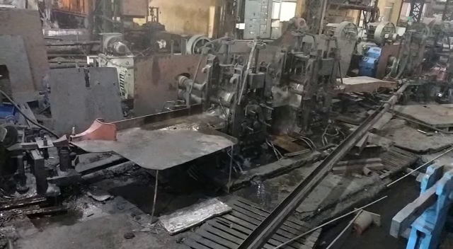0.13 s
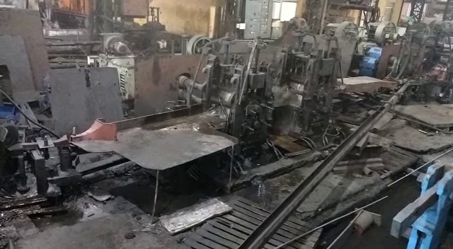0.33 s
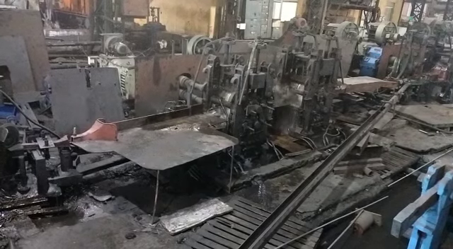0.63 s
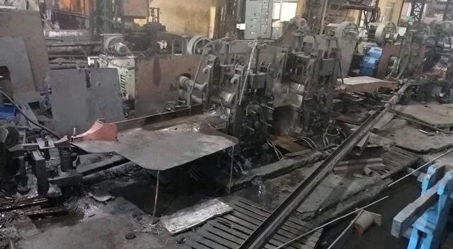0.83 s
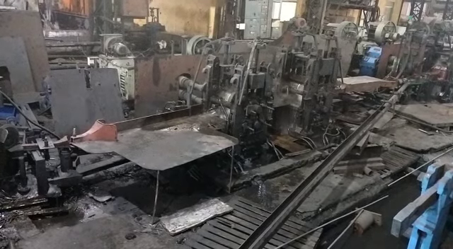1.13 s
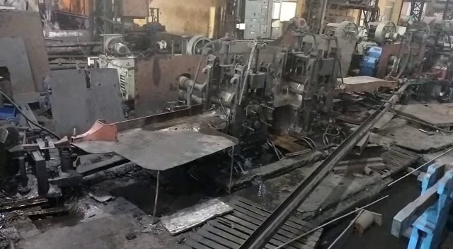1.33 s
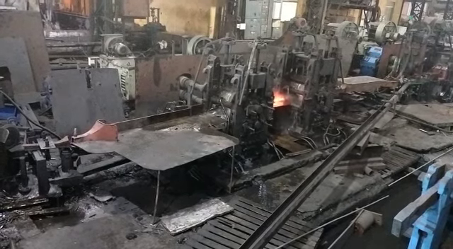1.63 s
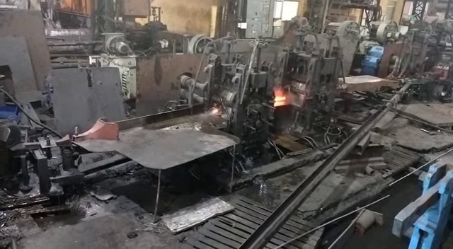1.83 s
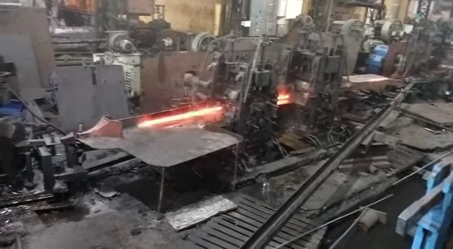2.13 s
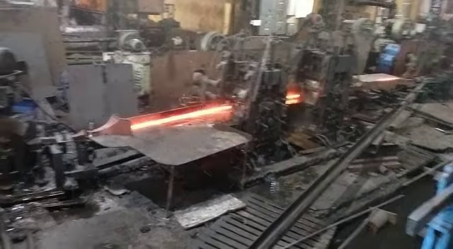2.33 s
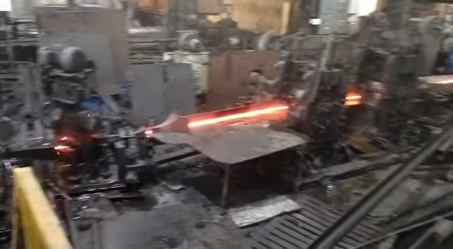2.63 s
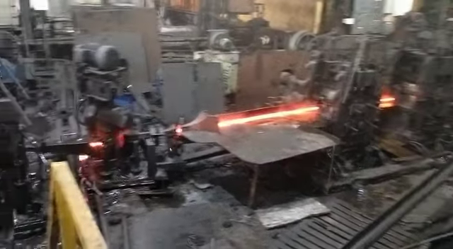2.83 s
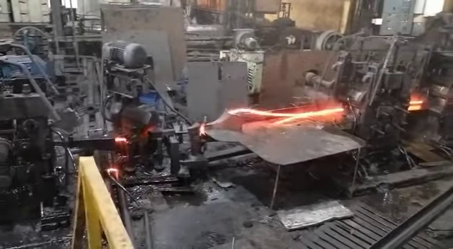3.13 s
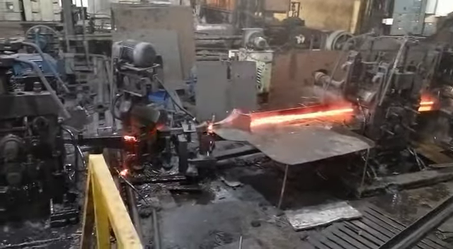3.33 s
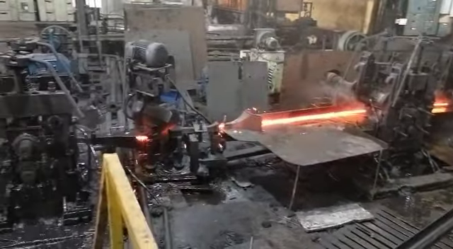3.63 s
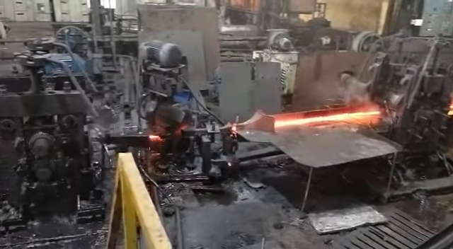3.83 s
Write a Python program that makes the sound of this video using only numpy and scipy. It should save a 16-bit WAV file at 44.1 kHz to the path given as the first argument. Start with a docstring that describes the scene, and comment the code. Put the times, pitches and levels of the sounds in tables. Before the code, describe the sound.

Rolling mill roars and hums, air valve hisses, then a metal bar clatters through rolls

```python
"""A steel rolling mill hall: drives and rolls roar, as patchy shaped noise, under unsteady sine tones.
A valve lets off air in two bursts of noise with a sagging whistle. A hot bar clanks through steel guides
and over a plate: clattering noise with ringing modes, rod pings, a grind in the rolls and a hall tail.
Two spaced microphones hear it; a gain control ducks after loud treble. The sound starts abruptly."""
import sys
import numpy as np
from scipy import signal
from scipy.fft import rfft, irfft, next_fast_len
from scipy.io import wavfile
from scipy.ndimage import uniform_filter1d, minimum_filter1d, map_coordinates

SR = 44100
rng = np.random.default_rng(int(sys.argv[2]) if len(sys.argv) > 2 else 0)


def to_linear_factor(level_db):
    """Convert decibel levels (scalar or array-like) to linear amplitude factors."""
    exponent = np.asarray(level_db, float) / 20
    return 10 ** exponent


def waveform_to_disk(signal):
    """Save audio, clipped to [-1, 1], as 16-bit WAV at the path in sys.argv[1]."""
    frames = np.transpose(np.atleast_2d(signal))
    scaled = np.clip(frames, -1, 1) * 32767
    samples = np.round(scaled).astype(np.int16)
    wavfile.write(sys.argv[1], SR, samples)


N = 176400
T = np.arange(N) / SR

# Slow swell of the machines. Each row: time in seconds, then roar, rasp, hum octave and hum gain in dB.
MACHINE_SWELL = [(.27, -2, 1, 1, 0.5), (.5, 0, 4, 6, -6), (.75, -1, 4, 2.5, 2.5), (1, -2.5, 5, -3, -2),
                 (1.35, 0.5, 6, -4, 2.5), (1.5, -0.5, 3.5, -5, -0.5), (1.75, -.5, 4, 6.5, 2),
                 (1.9, -1, 3.5, -4, 0), (2.15, -1.5, 3, -4, -5), (2.3, -2.5, 1, 0, -2.5),
                 (2.7, 0.5, 6, -0.5, 2.5), (2.95, 0, 4.5, 5, -2.5), (3.15, -3, 3.5, -5.5, 3.5),
                 (3.5, 0.5, 4.5, 3.5, 1), (3.75, -1.5, 4, -0.5, 2.5), (4, 1, 4.5, 0.5, -10.5)]


def unit(x):
    """Scales to rms 1."""
    return x / np.sqrt(np.mean(x ** 2) + 1e-20)


def along(points, hz):
    """Interpolates (Hz, value) points on a log frequency axis."""
    f, v = np.transpose(points)
    return np.interp(np.log(hz + 1), np.log(f + 1), v)


def wobble(rate):
    """A smooth random curve, rate knots a second (45 at most)."""
    return map_coordinates(rng.standard_normal(200), [T * min(rate, 45)])


def filtered(x, response):
    """Multiplies the spectrum of x by a response of frequency."""
    m = next_fast_len(x.shape[-1] + 8192)
    spectrum = rfft(x, m) * response(np.fft.rfftfreq(m, 1 / SR))
    return irfft(spectrum, m)[..., :x.shape[-1]]


def diffuse(spectrum, patchy_db):
    """Noise from all sides, patchy in time and pitch; two spaced microphones agree less at high pitch."""
    spacing_m, sound_m_per_s = 0.1637, 343
    z = signal.stft(rng.standard_normal((2, N)), nperseg=512)[2]
    field = uniform_filter1d(rng.standard_normal(z.shape[1:]), 5, 0)
    field = uniform_filter1d(field, 9, 1)
    pair = signal.istft(z * to_linear_factor(patchy_db * unit(field)), nperseg=512)[1][:, :N]

    def mid_side(hz):
        coherence = np.sinc(2 * hz * spacing_m / sound_m_per_s)
        turn = np.arccos(np.clip(coherence, -1, 1)) / 2
        return to_linear_factor(along(spectrum, hz)) * [np.cos(turn), np.sin(turn)]

    mid, side = filtered(pair, mid_side)
    return unit(np.array([mid + side, mid - side]))


def panned(x, left_db):
    """Two channels, left over right by left_db."""
    return x * to_linear_factor(np.array([[left_db / 2], [-left_db / 2]]))


def tone(hz, wander_hz):
    """A sine of rms 1 with wandering frequency."""
    phase = 2 * np.pi * np.cumsum(hz + wander_hz * wobble(22.005)) / SR
    return np.sqrt(2) * np.sin(phase + rng.uniform(0, 2 * np.pi))


def ring(modes, t, rough, attack_s):
    """Decaying struck modes with drifting phase, new strengths each blow."""
    walk = np.cumsum(rng.standard_normal((len(modes), len(t))), axis=1)
    drift = rough * uniform_filter1d(uniform_filter1d(walk, size=40), size=40)
    total = 0
    for (hz, db, t60), d in zip(modes, drift):
        decay = to_linear_factor(db + rng.normal(0, 1.3) - 60 * t / t60)
        total = total + decay * np.sin(2 * np.pi * hz * t + d)
    return total * (1 - np.exp(-(t / attack_s) ** 2))


def ring_pair(modes, t, rough, attack_s):
    """The same modes rung independently in each channel."""
    return np.array([ring(modes, t, rough, attack_s) for _ in range(2)])


def roar():
    """Rolls, drives and fans: three diffuse noises, low roar, rasp and high fizz, swelling slowly."""
    # Noise colours. Each row: frequency in Hz, relative level in dB.
    roar_colour = [(15, -52.5), (25, -63.5), (76, -28), (107, -12.5), (140, -9), (269, -5), (300, -2.5),
                   (425, -7), (557, -10.5), (593, -7), (642, -9), (985, -10), (1100, -20), (1430, -51.5),
                   (2420, -120)]
    rasp_colour = [(530, -3.5), (900, -2.5), (1130, -0.5), (1210, -3), (1290, -2.5), (2190, -10),
                   (2500, -3), (2850, -5), (3260, -3), (4100, -3), (4390, -8.5), (5840, -10), (6480, -22),
                   (7130, -23), (8800, -47.5), (11400, -83), (19400, -120)]
    fizz_colour = [(5060, -31), (8600, 5.5), (9240, -24), (9580, -21), (10100, 1.5), (11300, -10),
                   (11600, 4.5), (12000, 1), (13000, -0.5), (14800, -5), (15900, -4.5)]
    # Microphone mismatch. Each row: frequency in Hz, left over right in dB.
    mic_tilt = [(60, 0.83), (250, 1), (600, 0), (1100, 1.65), (2000, 6), (3000, 1.5), (3600, 0), (5000, -1),
                (6000, -5.5), (7100, -9.5), (8200, 3), (8800, 2), (10000, 1), (15000, -2.16)]
    roar_db, rasp_db, fizz_db = -15, -20, -62.5
    s, roar_swell_db, rasp_swell_db, _, _ = np.transpose(MACHINE_SWELL)
    low_gain = to_linear_factor(roar_db + np.interp(T, s, roar_swell_db) + 0.55 * wobble(7.35))
    high_gain = to_linear_factor(np.interp(T, s, rasp_swell_db) + 0.072 * wobble(11))
    low = low_gain * diffuse(roar_colour, patchy_db=0.83)
    rasp = to_linear_factor(rasp_db) * diffuse(rasp_colour, patchy_db=1.5)
    fizz = to_linear_factor(fizz_db) * diffuse(fizz_colour, patchy_db=2.5)
    rush = low + high_gain * (rasp + fizz)
    return filtered(rush, lambda hz: to_linear_factor(along(mic_tilt, hz) * np.array([[.5], [-.5]])))


def whine(hz, db, wander_hz, left_db):
    """A panned tone with fluttering level."""
    flutter_db, flutter_rate = 3, 22
    return panned(to_linear_factor(db + flutter_db * wobble(flutter_rate)) * tone(hz, wander_hz), left_db)


def drive_tones():
    """Gear and motor tones; the main motor hum and its octave swell on their own."""
    # Each row: frequency in Hz, level in dB, wander in Hz, left over right in dB.
    steady_tones = [(151.06, -33.5, 3.092, -2.5), (266.56, -28, 4.81, 0.5), (328.55, -32.5, 2.93, 4),
                    (448, -41, 2.39, 3), (1198.7, -38, 1.56, 0.5), (1303, -48.5, 1.87, 6.5),
                    (1617.2, -42.5, 2.2, 2.5), (3538, -46.5, 14, 1.5)]
    s, _, _, octave_swell_db, hum_swell_db = np.transpose(MACHINE_SWELL)
    hum = whine(298, db=-23.5, wander_hz=1.93, left_db=-1)
    octave = whine(600, db=-28.5, wander_hz=2.5, left_db=1)
    motor = to_linear_factor(np.interp(T, s, hum_swell_db)) * hum + to_linear_factor(np.interp(T, s, octave_swell_db)) * octave
    return motor + sum(whine(*row) for row in steady_tones)


def valve():
    """Air bursts out, holds, sputters and fades as pressure falls, the treble first; its whistle sags."""
    # Each row: start in seconds, level in dB, hold in seconds, t60 in seconds.
    puffs = [(0.982, -23, 0.013, 0.34), (1.152, -16, 0.08, 1.16)]
    # Each row: frequency in Hz, relative level in dB.
    air_colour = [(2500, -28), (3500, -10), (3950, -1), (4200, -2), (4500, -2.5), (4800, -9.5), (5200, -7),
                  (5650, -0.5), (6000, -13), (6500, -14.5), (7500, -16), (8800, -29), (9500, -44.5),
                  (10300, -31.5), (12000, -28.5), (13300, -36), (15300, -36), (15900, -41)]
    start_hz, end_hz, sag_s, width_hz, whistle_db = 5750, 5050, .1, 260, -7
    sputter_db = .8

    def shape(hold_share, fade_share, rise_s):
        total = 0
        for s, db, hold_s, t60 in puffs:
            fading_s = np.maximum(T - s - hold_share * hold_s, 0)
            total = total + to_linear_factor(db - 60 * fading_s / (fade_share * t60)) * np.clip((T - s) / rise_s, 0, 1)
        return total

    air = diffuse(air_colour, patchy_db=2.5)
    treble = filtered(air, lambda hz: 1 / (1 + (8000 / (hz + 1)) ** 8))
    since_s = np.min([np.where(T >= s, T - s, 10) for s, *_ in puffs], axis=0)
    pitch_hz = end_hz + (start_hz - end_hz) * np.exp(-(since_s / sag_s) ** 2)
    # narrow noise on a moving carrier
    blur = filtered(rng.standard_normal((2, 2, N)), lambda hz: 1 / (1 + (hz / width_hz) ** 2))
    phase = 2 * np.pi * np.cumsum(pitch_hz) / SR
    whistle = unit(blur[0] * np.cos(phase) + blur[1] * np.sin(phase))
    body = air - treble + to_linear_factor(whistle_db) * whistle
    jet = shape(1, 1, rise_s=.015) * body
    jet = jet + shape(hold_share=.15, fade_share=0.54, rise_s=.005) * treble
    return panned(to_linear_factor(sputter_db * wobble(30)) * jet, -1.7)


def roll_grind():
    """The bar runs through the rolls: patchy noise of uneven level, on from 2.5 s."""
    # Each row: frequency in Hz, relative level in dB.
    run_colour = [(900, -40.5), (1400, 1.5), (1800, -3.5), (2200, -0.5), (2650, -2.5), (3000, -10.5),
                  (3600, -4), (4500, -49)]
    start_s, rise_s, level_db, uneven_db = 2.5, 0.01, -31.5, 4
    noise = to_linear_factor(level_db + uneven_db * wobble(9)) * diffuse(run_colour, patchy_db=4)
    return noise * np.clip((T - start_s) / rise_s, 0, 1)


def rod_pings():
    """A short rod pings: struck modes, damped by a different share each time."""
    # Each row: start in seconds, level in dB, factor on the free ring time.
    pings = [(2.4, -20, .3), (2.413, -14, .35), (2.434, -20, 0.26), (2.612, -11, 1.1), (2.668, -20, .4),
             (2.697, -19, .6), (2.716, -16, .5), (2.841, -14, .35), (3.353, -16, .35), (3.41, -17, .35)]
    # Each row: frequency in Hz, relative level in dB, free t60 in seconds.
    rod_modes = [(4900, -8, .1), (5095, 1.5, .26), (5227, -4, .12), (5464, -6, .14), (5582, -1, .1),
                 (5835, -7, .1)]
    out, t = np.zeros((2, N + SR)), T[:SR // 2]
    for s, db, free in pings:
        modes = [(hz, level_db, t60 * free) for hz, level_db, t60 in rod_modes]
        out[:, round(s * SR):][:, :len(t)] += to_linear_factor(db) * ring_pair(modes, t, .05, .0015)
    return out[:, :N]


def clanks():
    """The bar slams the guides: grainy decaying clatter, with guide and plate modes ringing."""
    # Each row: start in seconds, level in dB, clatter t60 in seconds, brightness in dB per octave,
    # plate ring in dB, guide ring in dB.
    blows = [(.966, -26, 0.1, -11.5, -24.5, -3.5), (1.535, -21.5, .1, 4.5, -31, 0),
             (1.932, -14, 0.13, 1, -8, -1.5), (2.03, -16.5, 0.093, -2.5, -21, -4),
             (2.107, -15, 0.17, 2.5, -24.5, 1), (2.124, -13, 0.23, -2, -16, -8),
             (2.139, -15, .09, 5, -14, -6.5), (2.15, -11.5, 0.088, 6.5, -7.5, -12.5),
             (2.495, -17.5, 0.092, -2.5, -10.5, -6), (2.555, -21.5, 0.063, 1.5, -24, -5),
             (2.6, -16, 0.12, -0.5, -15.5, -3), (2.652, -14, 0.14, -1, -10, -2.5),
             (2.67, -12.5, 0.12, 0.5, -18, -4), (2.731, -8.5, 0.13, 0, -20.5, -7),
             (2.742, -15, 0.089, -3.5, -21.5, -5), (2.843, -16, 0.13, -1, -15, -6),
             (3.047, -19.5, .13, -4, -25.5, -3), (3.07, -16, 0.14, 0.5, -25, -1.5),
             (3.08, -16.5, 0.11, -2.5, -27, -2), (3.088, -9, 0.11, 3, -17.5, -8),
             (3.099, -10.5, 0.103, 1, -21.5, -8), (3.172, -21, 0.12, 1, -27, 1.5),
             (3.334, -11.5, 0.11, 2.5, -30, 0.5), (3.347, -14.5, .1, 3, -31, -6.5),
             (3.41, -19, 0.15, 0.5, -27.5, -6), (3.797, -24.5, 0.08, 6.9, -15.5, -3)]
    # Clatter colour. Each row: frequency in Hz, relative level in dB.
    crash_colour = [(200, -27), (500, -4), (1000, 1), (2000, 6.5), (3500, 7), (5500, 1), (7000, -12.5),
                    (8500, -26), (9300, -48), (10500, -38.5), (12500, -40), (15800, -40.5)]
    # Steel plate and roll guide modes. Each row: frequency in Hz, relative level in dB, t60 in seconds.
    plate_modes = [(2610, -3, 1), (2700, -7, .6), (3710, -3, .9), (3870, 0, 1.2)]
    guide_modes = [(810, 0, .14), (1100, -7, 0.082), (1960, -5, 0.092), (2560, -5, .08), (2790, -2, 0.1),
                   (3390, -2, 0.08), (3545, -2, 0.07), (3780, -6, 0.08), (4060, -6, 0.08), (4720, 0, 0.07)]
    rattle_db, attack_s = 4, 0.00306
    out, t = np.zeros((2, N + SR)), T[:SR // 2]
    for s, db, t60, slope, plate_db, guide_db in blows:
        tilt = lambda hz: slope * np.log2((hz + 1) / 3000)
        noise = filtered(rng.standard_normal((2, len(t))), lambda hz: to_linear_factor(along(crash_colour, hz) + tilt(hz)))
        grain_db = rattle_db * wobble(45)[::4][:len(t)]  # 180 knots a second
        clatter = unit(noise) * to_linear_factor(grain_db - 60 * t / t60) * (1 - np.exp(-(t / attack_s) ** 2))
        tilted = [(hz, level_db + tilt(hz), life_s) for hz, level_db, life_s in guide_modes]
        plate = to_linear_factor(plate_db) * ring_pair(plate_modes, t, 0.1696, 0.0025)
        guide = to_linear_factor(guide_db) * ring_pair(tilted, t, 0.0513, .003)
        out[:, round(s * SR):][:, :len(t)] += to_linear_factor(db) * (clatter + plate + guide)
    return out[:, :N]


def bar():
    """The bar's clanks, pings and grind, panned together."""
    return panned(clanks() + rod_pings() + roll_grind(), -0.92)


def hall(x):
    """The long, dull tail of the shed: convolution with decaying low-passed noise."""
    t60, build_s, dull_hz = 1, 0.014, 4500
    t = T[:SR]
    tail = filtered(rng.standard_normal((2, SR)), lambda hz: 1 / (1 + (hz / dull_hz) ** 4))
    tail = tail * to_linear_factor(-60 * t / t60) * (1 - np.exp(-t / build_s))
    return signal.fftconvolve(x, tail / np.linalg.norm(tail[0]), axes=1)[:, :N]


def scene():
    """Machines, valve and bar; the hall answers the bar."""
    hall_db = -8.5
    near = bar()
    return roar() + drive_tones() + valve() + near + to_linear_factor(hall_db) * hall(near)


def gain_control(dry):
    """Gain that drops soon after treble-heavy peaks and creeps back."""
    ear_hz, window_s, limit_db, depth, recover_db_per_s = 1585, 0.00938, -5.5, 0.707, 22.5
    delay = 300  # samples
    heard = filtered(dry, lambda hz: np.sqrt(1 + (hz / ear_hz) ** 2))
    power = uniform_filter1d((heard ** 2).mean(0), int(window_s * SR) + 1)
    level_db = 10 * np.log10(np.abs(power) + 1e-9)
    held_db = np.maximum.accumulate(level_db + recover_db_per_s * T) - recover_db_per_s * T
    duck_db = uniform_filter1d(-depth * np.maximum(held_db - limit_db, 0), 441)
    return to_linear_factor(np.pad(duck_db, (delay, 0), mode="edge")[:N])


def limited(x):
    """A look-ahead limiter: smoothed gain holds the peaks near the ceiling."""
    ceiling = .97
    need = minimum_filter1d(np.minimum(1, ceiling / (np.abs(x).max(0) + 1e-9)), size=401)
    return x * uniform_filter1d(uniform_filter1d(need, size=200), size=200)


def top_cut(x):
    """Nothing passes above the cut-off."""
    return signal.sosfilt(signal.butter(12, 16890, fs=SR, output="sos"), x)


def record(dry):
    """Band limits, gain control, an abrupt start, then the limiter."""
    low_cut_hz, top_hz, start_s = 58.5, 15830, .2709
    x = filtered(dry, lambda hz: (hz < top_hz) / (1 + (low_cut_hz / (hz + 1)) ** 5))
    x = x * gain_control(dry) * (T >= start_s)
    return top_cut(limited(x))


dry = scene()
out = record(dry)
waveform_to_disk(out)
```